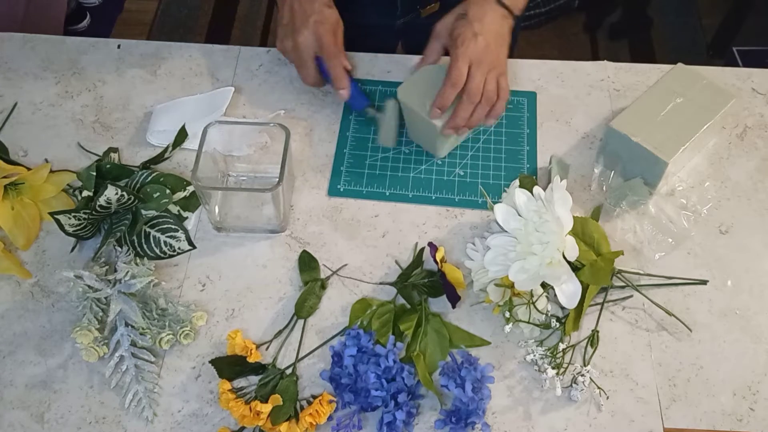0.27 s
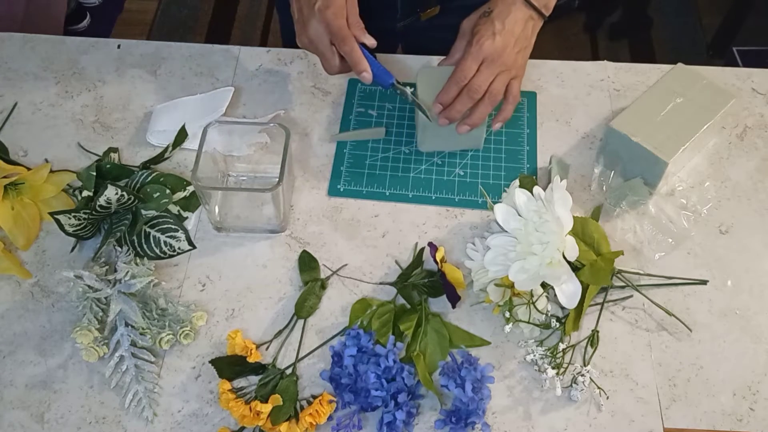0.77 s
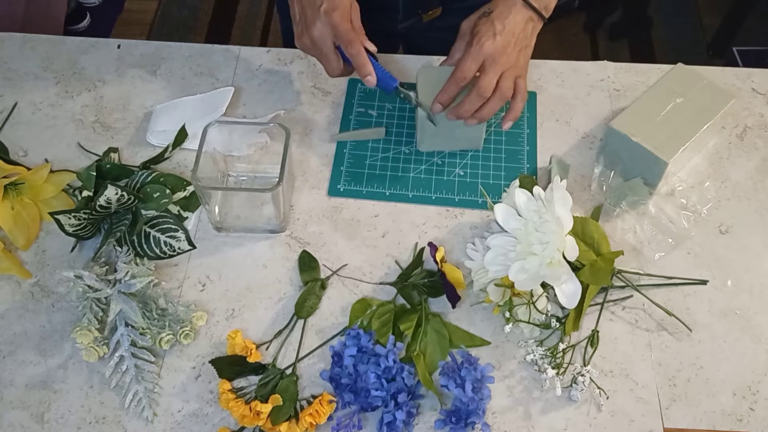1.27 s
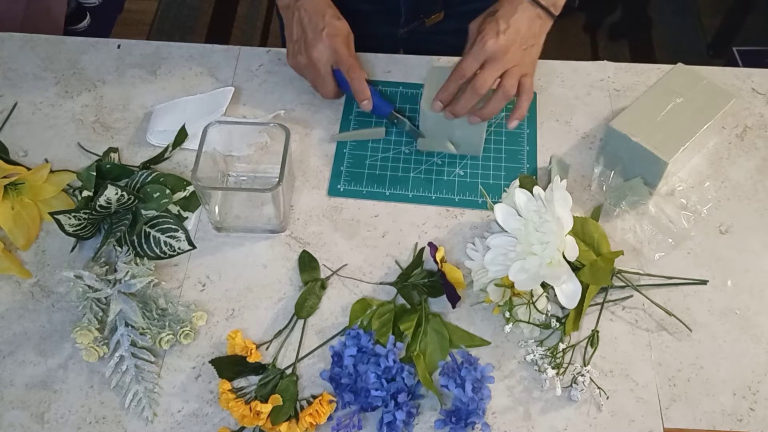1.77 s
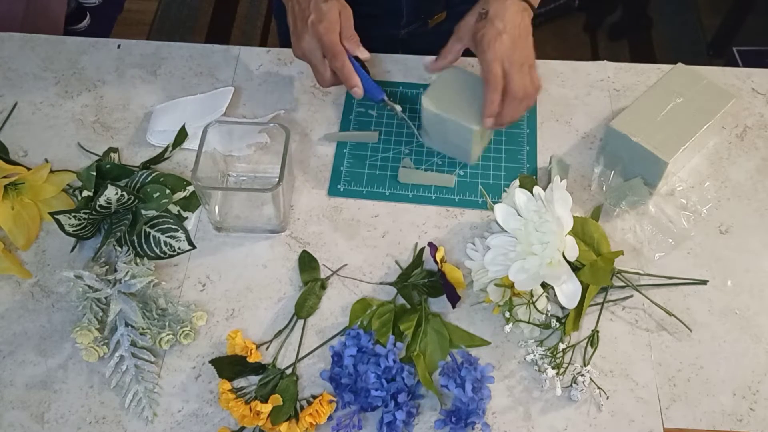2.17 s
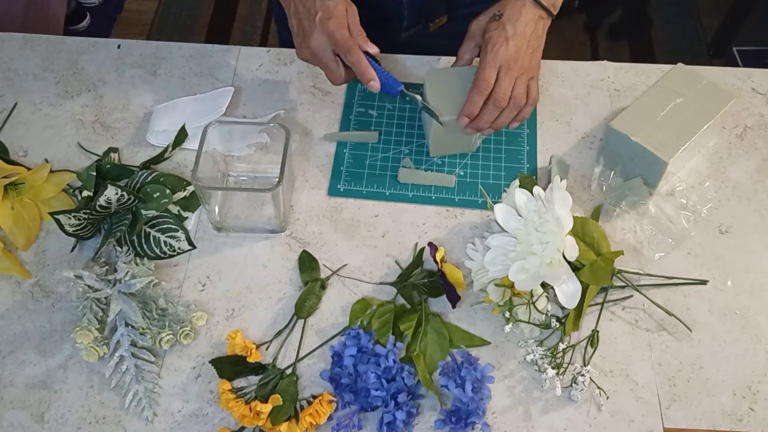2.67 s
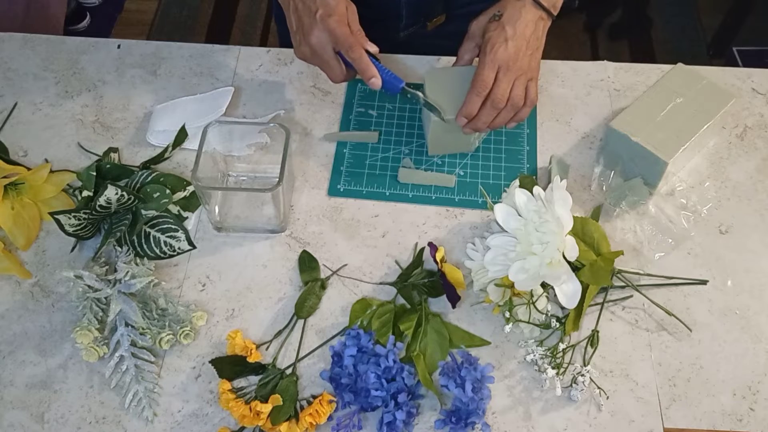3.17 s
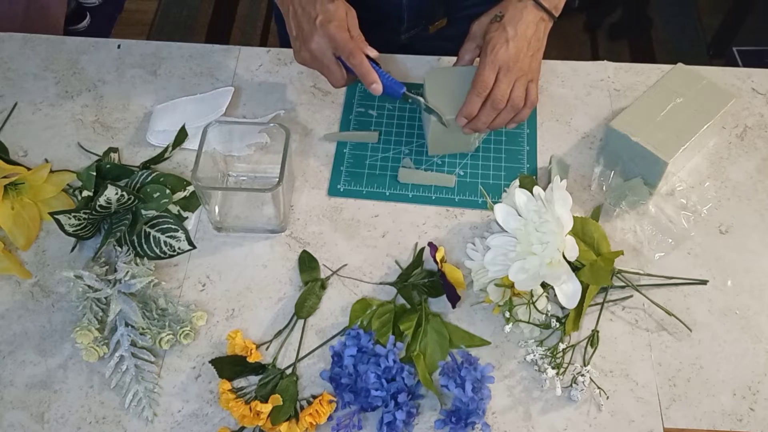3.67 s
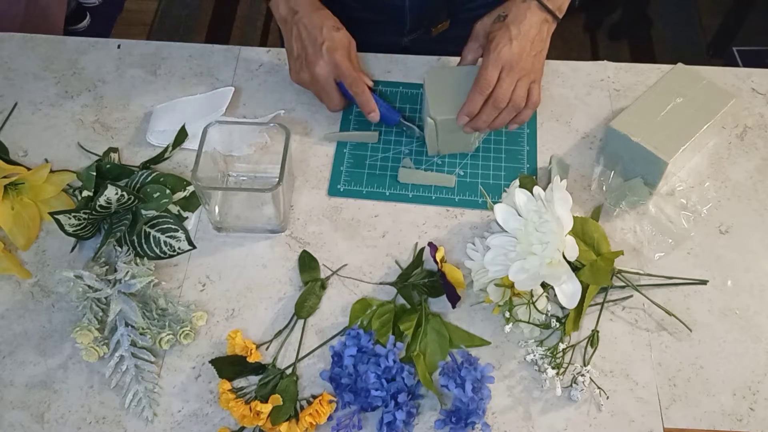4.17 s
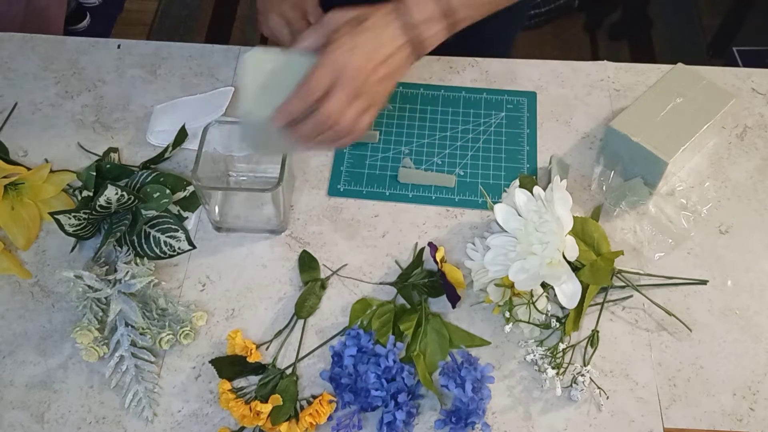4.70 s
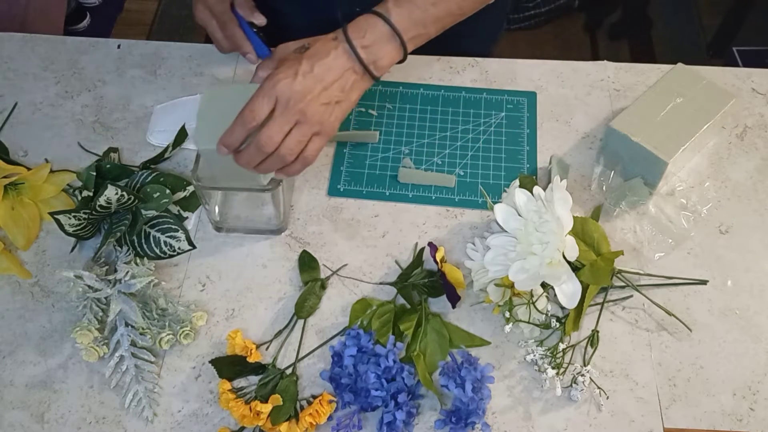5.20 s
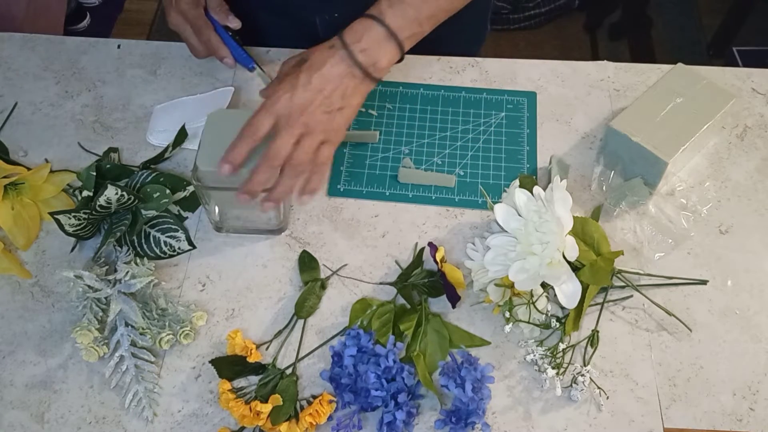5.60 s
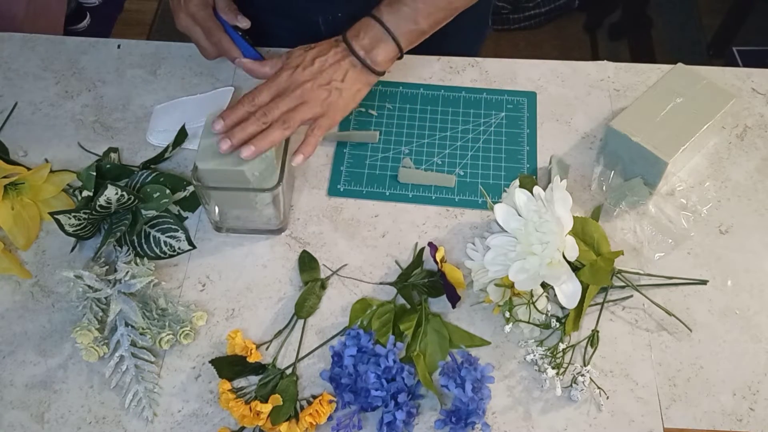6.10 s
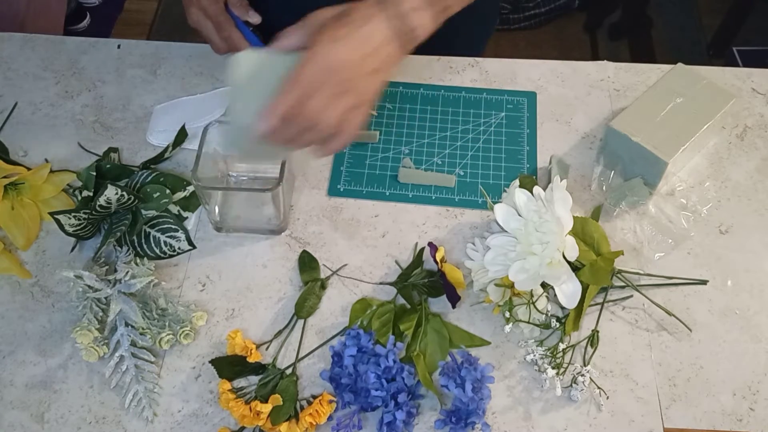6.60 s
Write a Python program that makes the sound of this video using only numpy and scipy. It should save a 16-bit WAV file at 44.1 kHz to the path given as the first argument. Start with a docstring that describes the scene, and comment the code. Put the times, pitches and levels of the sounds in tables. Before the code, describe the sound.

A close, fairly dry sound in a small quiet workroom. At 0 s the end of a knife cut through dry floral foam hisses briefly and lands with a dull knock on a matted table. Until about 0.5 s there are scuffs, crisp snaps and low thuds, then faint finger rubs and a tiny squeak. Short jerks near 1.25 s lead into a strong, gritty, bright hiss from 1.35 to 1.7 s, its hollow colour sinking, ending in a knock. A sharp snap and thin scuffs follow at 1.8 to 2.4 s, then sparse crumbly ticks. Another jerky start at 3.7 s becomes a rasping cut until 4.1 s, with a thud and a snap at 4.3 s. Afterwards it is much quieter: a small click at 4.65 s, soft low bumps of the block on a glass vase around 5.0, 5.2 and 5.65 s, and a light scraping rub at 6.4 to 6.6 s, fading into low room tone.

```python
"""First a knife is heard in mid-cut through dry floral foam: a hiss, then a knock on the mat-covered table.
The hiss is a dense train of random cell fractures, coloured by blade modes and a hollow from the deepening slit.
Two more cuts follow; between them fingers scuff the block in thin hisses with snaps, clicks and squeaks.
Later the block bumps on the rim of a glass vase: stick-slip noise driving low modes.
Echoes from near surfaces, a small room's decay, a quiet room tone and microphone resonances complete the sound.
"""
import sys
import numpy as np
from scipy import signal
from scipy.fft import rfft, irfft, next_fast_len
from scipy.io import wavfile
from scipy.ndimage import uniform_filter1d

SR = 44100
rng = np.random.default_rng(int(sys.argv[2]) if len(sys.argv) > 2 else 0)


def materialize(psi):
    """Save the field psi as 16-bit PCM at rate SR to the path in sys.argv[1].

    A 1-D psi becomes a single channel; in a 2-D psi each row is a channel.
    """
    bounded = np.clip(np.atleast_2d(psi).T, -1, 1)
    quanta = np.round(bounded * 32767).astype(np.int16)
    wavfile.write(sys.argv[1], SR, quanta)


N = 302085
TIME = np.arange(N) / SR
CUTOFF_HZ = 16000
SOUND_MM_PER_S = 343000

# Levels of events apply before the echoes, room and microphone.
# Steady cuts through the block. Each row: start in seconds, length in seconds, hiss level in dB,
# slit depth at the start in mm, sinking speed in mm/s.
CUTS = [(-.03, 0.061, -26, 26, 120), (1.365, 0.32, -26, 9, 73), (3.716, 0.39, -27, 1, 66)]
CUT_ATTACK_S, CUT_RELEASE_S = 0.02, 0.045
# Forward jerks of the blade entering the foam. Each row: start in seconds, length in seconds, hiss level in dB.
BITES = [(1.15, .04, -63), (1.206, 0.042, -47), (1.253, 0.012, -26), (1.287, .027, -25),
         (3.685, 0.011, -25), (3.718, 0.0092, -33.5), (3.793, 0.042, -27)]
BITE_ATTACK_S, BITE_RELEASE_S = 0.0094, 0.027
# Modes of the free part of the blade. Each row: frequency in Hz, width in Hz, gain in dB.
BLADE_MODES = [(1023, 21, 0), (2480, 170, -7.5), (3050, 210, 0.5), (6470, 410, 1)]
# Spectrum of the cutting hiss. Each row: frequency in Hz, density in dB per Hz.
CUT_COLOUR = [(60, -32), (200, -22.5), (420, -11), (700, -6), (1000, -9), (1400, -9.5), (2400, -1.5),
              (3300, -1.5), (4300, -0.5), (5600, 3), (10000, 1), (16000, -15)]
# Gain of the top octave for a shallow and a deep slit, in dB: it grows as more of the blade rubs in the slit.
SHALLOW_TOP_DB, DEEP_TOP_DB = -1.5, 1

# Foam scuffed by fingers, blade flat, mat and vase. Each row: start in seconds, length in seconds,
# level in dB, top-octave gain in dB.
RUBS = [(0.182, 0.14, -39.5, -2.5), (0.327, 0.07, -31.5, -3), (0.436, 0.088, -44.5, 4),
        (0.549, 0.08, -54.5, 1.5), (0.721, .18, -38.5, 1.5), (0.97, 0.011, -51, -4), (1.026, 0.044, -59, 0),
        (1.786, 0.17, -29.5, -1.5), (2.231, 0.18, -34.5, 5), (2.593, 0.053, -48, 1.5),
        (2.676, 0.028, -51, 6.5), (2.746, 0.074, -49, 1), (2.868, 0.028, -50, -5), (2.968, 0.057, -50, 6),
        (3.082, 0.084, -51, -2), (3.266, 0.015, -47.5, -1), (3.614, 0.055, -51.5, -20.5),
        (4.224, 0.032, -48, 4), (4.276, 0.089, -39, 5.5), (4.387, 0.079, -54.5, 8), (4.493, 0.21, -64, 4.5),
        (4.922, .02, -62.5, 7), (5.034, 0.031, -60.5, 7), (5.128, 0.029, -58, 7), (5.183, 0.091, -58, 4),
        (5.291, 0.17, -62, -15), (5.529, 0.079, -59.5, 4.5), (5.619, 0.054, -45, 13.5),
        (6.039, 0.043, -59, -3), (6.121, 0.055, -61.5, -5), (6.176, 0.09, -57, 1.5),
        (6.409, 0.036, -39, 3.5), (6.51, 0.065, -46.5, 15.5), (6.594, 0.053, -57, -13)]
RUB_RISE_SHARE, RUB_RISE_MAX_S, RUB_RELEASE_S = 0.25, 0.036, 0.022  # a longer rub builds up more slowly
# Spectrum of the rubbing hiss. Each row: frequency in Hz, density in dB per Hz.
RUB_COLOUR = [(60, -37.5), (300, -23.5), (900, -16), (1500, -15.5), (2200, -3), (3100, 0.5), (4200, 0),
              (5600, 4.5), (10000, -1), (16000, -20)]

# Crumbs snapping and the blade tip pricking the foam. Each row: start in seconds, level in dB.
SNAPS = [(0.092, -15.5), (0.159, -16), (0.1819, -18), (0.188, -8.5), (0.4741, -17), (0.5592, -23.5),
         (1.256, -10.5), (1.7735, -24.5), (1.7932, -7), (2.7842, -28.5), (3.0904, -23.5), (3.619, -35),
         (3.6925, -26), (4.295, -26), (4.335, -12.5), (4.5064, -29), (5.2335, -27.5)]
# Spectrum of the snaps. Each row: frequency in Hz, density in dB per Hz.
SNAP_COLOUR = [(200, -17), (1500, -7), (3000, -2.5), (6000, 4.5), (10000, 0.5), (16000, -17.5)]

# Blade or block landing on the mat and dragging. Each row: start in seconds, level in dB,
# drag in seconds, hardness as a low-pass corner in Hz.
LANDINGS = [(0.042, -34.5, 0.04, 1470), (0.1, -47.5, 0.018, 890), (0.215, -44, 0.056, 250),
            (0.345, -35.5, 0.0068, 650), (0.364, -31.5, 0.015, 644), (0.461, -44.5, 0.035, 490),
            (1.686, -31.5, 0.039, 1500), (1.888, -40, 0.078, 600), (4.11, -31.5, 0.043, 1410)]
# Modes of the table top. Each row: frequency in Hz, width in Hz, gain in dB.
TABLE_MODES = [(108, 8, -6), (174, 13, -1), (217, 69, -6), (342, 130, -5), (432, 74, 2), (458.8, 8.3, 5),
               (523, 11.5, 6), (653, 19, 1.5), (803, 31, -0.5), (1274, 38, -8.5), (1544, 120, -16)]

# Block bumping and juddering on the vase rim. Each row: start in seconds, level in dB,
# drag in seconds, centre of the contact band in Hz.
BUMPS = [(5.039, -49, 0.036, 118), (5.226, -42, 0.03, 193), (5.615, -53, 0.023, 174),
         (5.666, -39, 0.02, 322), (6.053, -61.5, 0.021, 710), (6.129, -65, 0.085, 716),
         (6.417, -46, 0.046, 820), (6.475, -61, 0.056, 665), (6.578, -60, 0.05, 433)]
# Modes of the block in the vase. Each row: frequency in Hz, width in Hz, gain in dB.
VASE_MODES = [(110, 31, -3), (196, 45, 3.5), (415, 64, 2), (501, 19, 8), (604, 38, 4), (980, 53, -15.5)]

# Small dull clicks. Each row: start in seconds, level in dB, pitch in Hz.
TAPS = [(0.564, -55, 1100), (2.139, -63, 1100), (4.648, -47, 1890), (5.451, -59, 1590)]
# Thin sinking squeaks. Each row: start in seconds, length in seconds, level in dB, starting pitch in Hz.
SQUEAKS = [(0.621, 0.024, -59.5, 1880), (2.206, 0.012, -59.5, 2486), (4.645, 0.15, -72, 1855)]
SQUEAK_FALL_OCT_PER_S, SQUEAK_WIDTH_HZ = 1.4, 103

# Glancing echoes from table, hands and block. Each row: mean delay in ms, strength as a signed gain.
NEAR_ECHOES = [(0.9, .25), (1.7, -.3), (3.1, .35)]
# Decay of the room. Each row: frequency in Hz, time to fall by 60 dB in seconds.
ROOM_T60 = [(100, 0.27), (500, 0.26), (2000, 0.25), (5000, 0.093), (15000, 0.099)]
# Spectrum of the quiet room. Each row: frequency in Hz, density in dB per Hz.
ROOM_TONE = [(25, -17), (70, 2.5), (130, 1.5), (300, -8), (700, -11), (2200, -23), (5000, -21), (8500, -30)]
# Microphone resonances. Each row: frequency in Hz, nominal width in Hz (scaled by the gain), gain in dB.
MIC_RESONANCES = [(6274, 550, 4.5), (7834, 1000, -7.5), (12710, 4350, -13), (14450, 2820, 19)]


def from_db(db):
    """Logarithmic level: decibels to amplitude gain."""
    return 10 ** (np.asarray(db) / 20)


def rms_one(x):
    """Normalisation: scale to unit rms."""
    return x / np.sqrt(np.mean(x ** 2) + 1e-20)


def at_hz(points, hz):
    """Interpolation: read a table on a log-frequency axis."""
    table_hz, value = np.transpose(points)
    return np.interp(np.log(np.maximum(hz, 1)), np.log(table_hz), value)


def colour(x, spectrum):
    """Minimum phase: a folded cepstrum gives a causal filter with the given spectrum."""
    size = 2 * next_fast_len(N)
    gain = from_db(at_hz(spectrum, np.fft.rfftfreq(size, 1 / SR)))
    cepstrum = irfft(np.log(gain))
    cepstrum[1:size // 2] *= 2
    cepstrum[size // 2 + 1:] = 0
    response = np.exp(rfft(cepstrum))
    return irfft(rfft(x, size) * response)[:N]


def band(hz, width_hz):
    """Simple resonance: filter coefficients with gain 1 at the peak."""
    hz = min(hz, 0.45 * SR)
    return signal.iirpeak(hz, hz / min(width_hz, SR / 4), fs=SR)


def body(force, modes):
    """Modal superposition: parallel modes of alternating sign driven by one force."""
    out = 0
    for k, (hz, width_hz, db) in enumerate(modes):
        out = out + (-1) ** k * from_db(db) * signal.lfilter(*band(hz, width_hz), force)
    return out


def drift(rate_hz):
    """Low-pass random process: smooth chance of unit rms."""
    r = np.exp(-2 * np.pi * rate_hz / SR)
    smooth = signal.lfilter([1], [1, -2 * r, r * r], rng.standard_normal(N + SR))
    return rms_one(smooth[SR:])  # the first second settles the filter


def grains(per_s, spread_db):
    """Random impulse train: tiny fractures at random moments and of uneven size, with unit rms."""
    sizes = from_db(spread_db * np.minimum(rng.exponential(1, N), 4))
    signs = rng.choice([-1, 1], N)
    return rms_one(sizes * signs * (rng.random(N) < per_s / SR))


def burst(start, hold, fade, rise=0.0048):
    """Contact envelope: squared rise, hold and exponential decay."""
    out, first = np.zeros(N), max(int(start * SR), 0)
    t = np.maximum(TIME[first:first + SR] - start, 0)
    decay = np.exp(-np.maximum(t - rise - hold, 0) / fade)
    out[first:first + len(t)] = np.minimum(t / rise, 1) ** 2 * decay
    return out


def stroke(start, length, rise, release):
    """Effort envelope of one hand movement: length counts up to the release."""
    return burst(start, max(length - rise, 0), release, rise)


def top_octave(x):
    """Zero-phase filtering: the highest part of a hiss, without delay."""
    return signal.sosfiltfilt(signal.butter(2, 7500, "high", fs=SR, output="sos"), x)


def cutting():
    """Brittle fracture: cells crush in a dense, uneven stream that excites the foam-damped blade modes."""
    unevenness = from_db(1.3 * drift(35))
    flicker = from_db(1.0 * drift(370))
    cells = grains(per_s=16000, spread_db=2.0) * unevenness * flicker
    hz = slit_hz()
    # the blade rings less as the slit deepens
    blade = np.sqrt(hz / CUTOFF_HZ) * sum(body(cells, [mode]) for mode in BLADE_MODES)
    hiss = slit_hollow(colour(cells + blade, CUT_COLOUR), hz, depth=0.49, width_share=0.61)
    top_db = np.interp(hz, [0, CUTOFF_HZ], [DEEP_TOP_DB, SHALLOW_TOP_DB])
    return blade_effort() * rms_one(hiss + (from_db(top_db) - 1) * top_octave(hiss))


def blade_effort():
    """Addition of powers: steady strokes and jerks combine as incoherent sources."""
    power = np.zeros(N)
    for start, length, db, *_ in CUTS:
        power += (from_db(db) * stroke(start, length, CUT_ATTACK_S, CUT_RELEASE_S)) ** 2
    for start, length, db in BITES:
        power += (from_db(db) * stroke(start, length, BITE_ATTACK_S, BITE_RELEASE_S)) ** 2
    return np.sqrt(power)


def slit_hz():
    """Quarter-wave resonance: pitch falls as the slit deepens, and each cut opens a new slit."""
    depth_mm = np.zeros(N)
    for start, length, _, first_mm, mm_per_s in CUTS:
        during = (TIME >= start) & (TIME < start + length + 0.5)
        depth_mm[during] = first_mm + mm_per_s * np.minimum(TIME[during] - start, length)
    return np.minimum(SOUND_MM_PER_S / (4 * np.maximum(depth_mm, 1)), CUTOFF_HZ)


def slit_hollow(x, hz, depth, width_share):
    """Interference: sound returning from the slit bottom weakens one band, lower as the blade sinks."""
    resonance, state, size = np.zeros(N), np.zeros(2), 64
    for i in range(0, N, size):  # a band-pass retuned every 64 samples
        w = 2 * np.pi * hz[i] / SR
        damp = np.tan(np.pi * width_share * hz[i] / SR)
        top, bottom = [damp, 0, -damp], [1 + damp, -2 * np.cos(w), 1 - damp]
        resonance[i:i + size], state = signal.lfilter(top, bottom, x[i:i + size], zi=state)
    return x - depth * resonance


def rubbing():
    """Sliding friction: light contact scuffs the surface cells into a thin hiss, crumbly when faint."""
    unevenness = from_db(1.0 * drift(50))
    hiss = rms_one(colour(grains(per_s=7400, spread_db=1.5) * unevenness, RUB_COLOUR))
    top = top_octave(hiss)
    ticks, out = crumbs(per_s=300, count=20), np.zeros(N)
    for start, length, db, top_db in RUBS:
        crumbly = np.interp(db, [-58, -34], [0.38, 0.08])  # share of power in the ticks
        bright_hiss = hiss + (from_db(top_db) - 1) * top
        scuff = np.sqrt(1 - crumbly) * bright_hiss + np.sqrt(crumbly) * ticks
        rise = min(RUB_RISE_SHARE * length, RUB_RISE_MAX_S)
        out += from_db(db) * stroke(start, length, rise, RUB_RELEASE_S) * scuff
    return out


def crumbs(per_s, count):
    """Impulse response: loose crumbs tick under the contact, each ringing at a pitch of its own."""
    out = np.zeros(N)
    for hz in np.geomspace(3000, 10000, count):
        hits = grains(per_s / count, spread_db=2.2)
        out += signal.lfilter(*band(hz, hz / 14), hits + 1e-18) / hz
    return rms_one(out)


def snaps():
    """Impulsive fracture: a sharp crack with a few milliseconds of crumbling behind it."""
    cracks, crumble = np.zeros(N), np.zeros(N)
    for start, db in SNAPS:
        cracks[int(start * SR)] += from_db(db)
        crumble += from_db(db) * burst(start, hold=0.001, fade=0.0051, rise=0.00069)
    fractures = grains(per_s=12000, spread_db=2)
    return colour(from_db(-5.5) * cracks + from_db(-11.5) * crumble * fractures, SNAP_COLOUR)


def judder(modes, slips_per_s):
    """Stick-slip excitation: random slips drive a body's modes, with mean strength held steady."""
    ring = body(grains(per_s=slips_per_s, spread_db=1.0), modes)
    return ring / np.sqrt(uniform_filter1d(ring ** 2, size=1500) + 1e-12)


def table_knocks():
    """Forced plate vibration: drags on the mat drum the table top; soft contacts lose the upper modes."""
    drum, out = judder(TABLE_MODES, slips_per_s=900), np.zeros(N)
    for start, db, drag, hard_hz in LANDINGS:
        knock = drum * burst(start, drag, fade=0.0078)
        out += from_db(db) * signal.lfilter(*signal.butter(3, hard_hz, fs=SR), knock + 1e-18)
    return signal.sosfilt(signal.butter(4, 75, "high", fs=SR, output="sos"), out)


def vase_bumps():
    """Band-limited contact: the block catches on the rim, deep when pressed down, higher when it slides."""
    drum, out = judder(VASE_MODES, slips_per_s=400), np.zeros(N)
    for start, db, drag, hz in BUMPS:
        contact = signal.butter(3, [hz / 2, hz * 2], "band", fs=SR, output="sos")
        bump = drum * burst(start, drag, fade=0.0045)
        out += from_db(db) * signal.sosfilt(contact, bump + 1e-18)
    return signal.sosfilt(signal.butter(4, 1000, fs=SR, output="sos"), out)


def taps():
    """Damped resonance: short, dull clicks of noise through one broad resonance each."""
    contact, out = rng.standard_normal(N), np.zeros(N)
    for start, db, hz in TAPS:
        ring = rms_one(signal.lfilter(*band(hz, 0.28 * hz), contact))
        out += from_db(db) * ring * burst(start, hold=0.002, fade=0.01, rise=0.001)
    return out


def squeaks():
    """Random modulation: a narrow, rough tone that sinks as the slide slows."""
    out = np.zeros(N)
    roughness = drift(SQUEAK_WIDTH_HZ) + 1j * drift(SQUEAK_WIDTH_HZ)
    for start, length, db, hz in SQUEAKS:
        pitch_hz = hz * 2 ** (-SQUEAK_FALL_OCT_PER_S * np.maximum(TIME - start, 0))
        tone = np.real(roughness * np.exp(2j * np.pi * np.cumsum(pitch_hz) / SR))
        out += from_db(db) * stroke(start, length, rise=0.0021, release=0.013) * tone
    return out


def near_echoes(x):
    """Comb filtering: close surfaces return delayed copies, and the comb shifts as the hands move."""
    out, fine = x, signal.resample_poly(x, 2, 1)
    for ms, strength in NEAR_ECHOES:
        delay = ms / 1000 * (1 + 0.06 * drift(1))
        out = out + strength * np.interp(2 * SR * (TIME - delay), np.arange(2 * N), fine, left=0)
    return out / np.sqrt(1 + sum(strength ** 2 for _, strength in NEAR_ECHOES))


def room(x, wet_db):
    """Diffuse reverberation: echoes of a small workroom die exponentially, band by band."""
    t, edges = TIME[:SR // 2], np.geomspace(60, 18000, 9)
    tail = np.zeros(len(t))
    for low, high in zip(edges, edges[1:]):
        band_pass = signal.butter(2, [low, high], "band", fs=SR, output="sos")
        noise = signal.sosfilt(band_pass, rng.standard_normal(len(t)))
        tail += noise * 1000 ** (-t / at_hz(ROOM_T60, np.sqrt(low * high)))
    tail = tail * (t > 0.004)  # diffuse sound arrives after 4 ms
    return x + from_db(wet_db) * signal.fftconvolve(x, tail / np.linalg.norm(tail))[:N]


def room_tone():
    """Stationary noise: a quiet, mostly low background."""
    return from_db(-74.0) * rms_one(colour(rng.standard_normal(N), ROOM_TONE))


def scene():
    """Superposition: foam, table and vase add up in a quiet room."""
    foam = room(near_echoes(cutting() + rubbing()) + snaps(), wet_db=-10)
    knocks = room(table_knocks() + vase_bumps(), wet_db=-9.5)
    clicks = room(taps() + squeaks(), wet_db=-1.5)
    return (foam + knocks + clicks + room_tone())[None]


def record(dry):
    """Transducer response: the microphone's port resonances colour the treble; the top is cut."""
    out = dry
    for hz, width_hz, db in MIC_RESONANCES:
        resonance = signal.lfilter(*band(hz, width_hz * from_db(-db / 2)), out)
        out = out + (from_db(db) - 1) * resonance
    return signal.sosfilt(signal.ellip(12, 0.2, 80, CUTOFF_HZ, fs=SR, output="sos"), out)


dry = scene()
out = record(dry)
materialize(out)
```